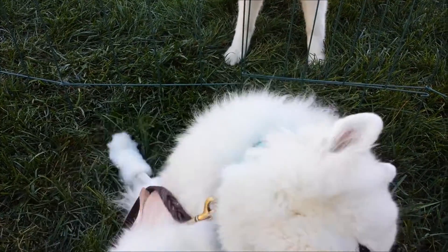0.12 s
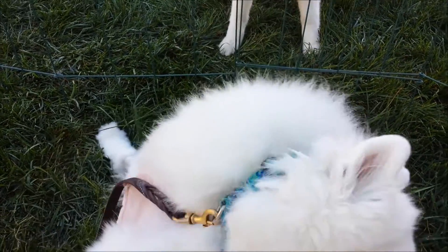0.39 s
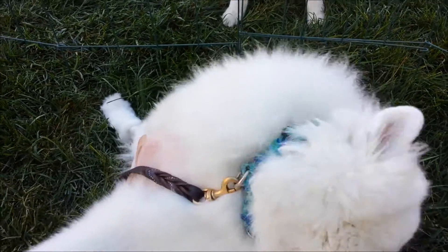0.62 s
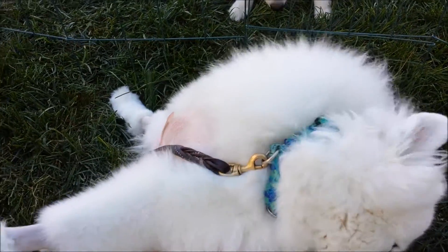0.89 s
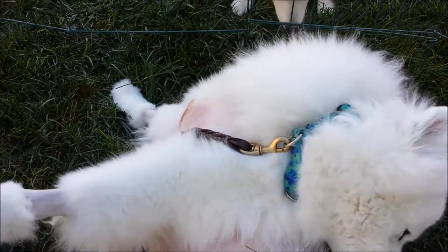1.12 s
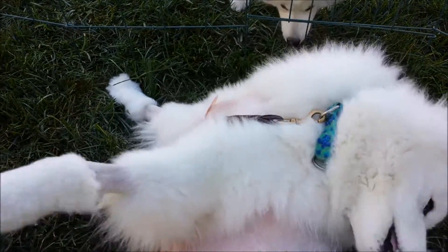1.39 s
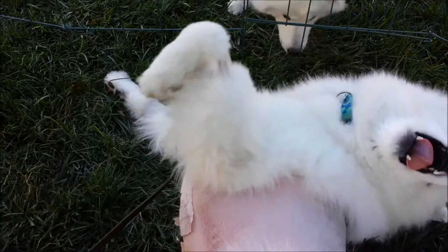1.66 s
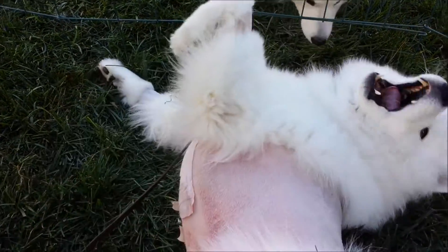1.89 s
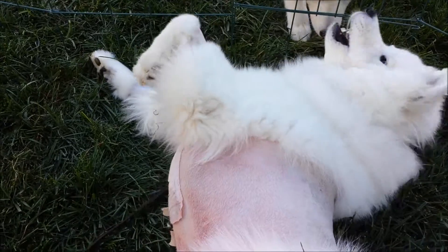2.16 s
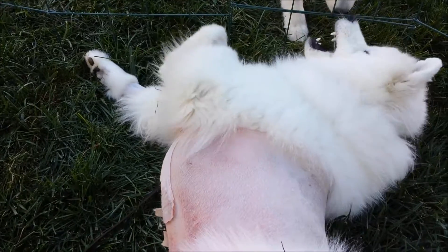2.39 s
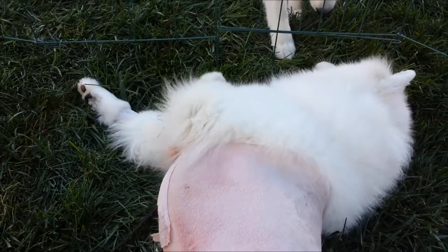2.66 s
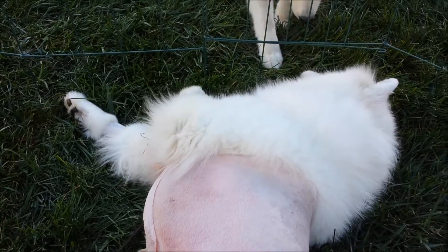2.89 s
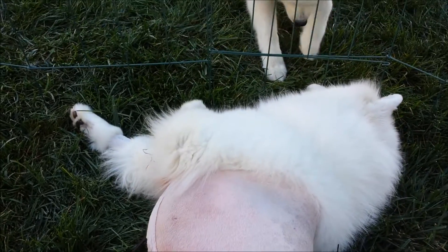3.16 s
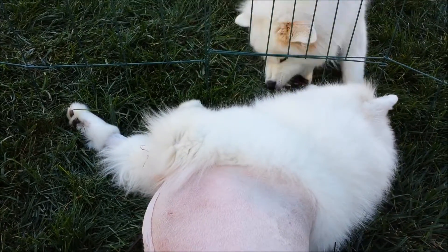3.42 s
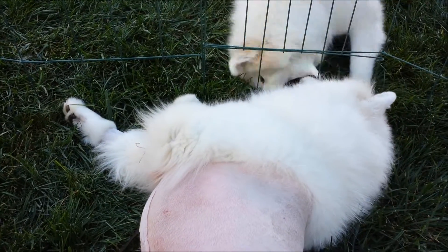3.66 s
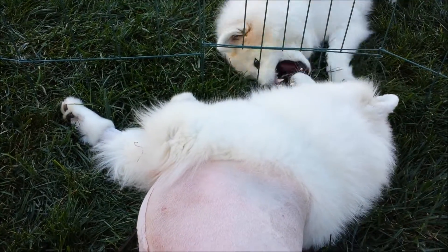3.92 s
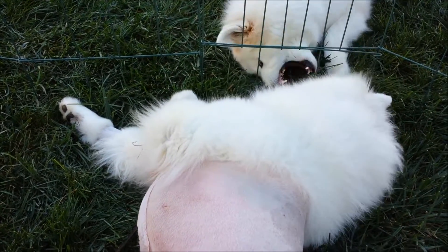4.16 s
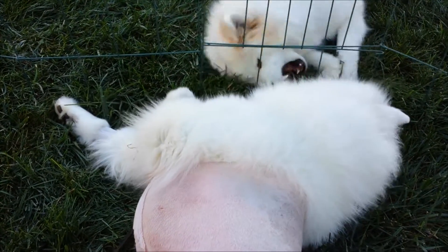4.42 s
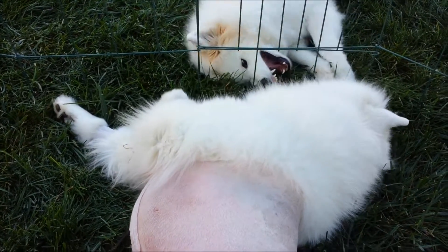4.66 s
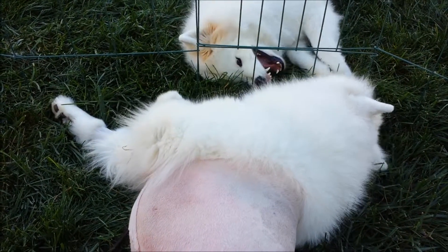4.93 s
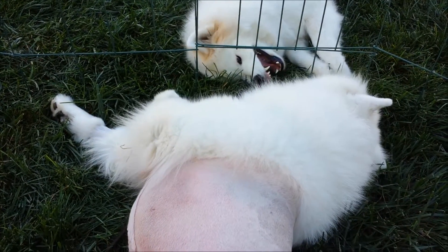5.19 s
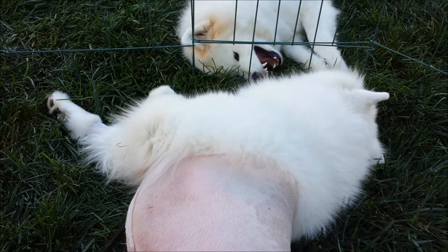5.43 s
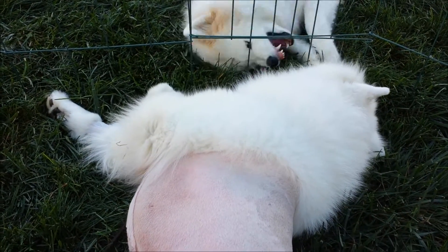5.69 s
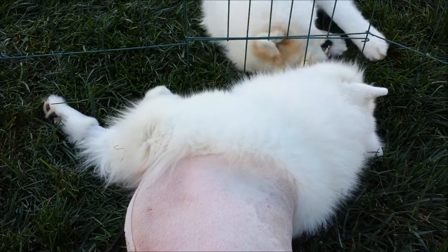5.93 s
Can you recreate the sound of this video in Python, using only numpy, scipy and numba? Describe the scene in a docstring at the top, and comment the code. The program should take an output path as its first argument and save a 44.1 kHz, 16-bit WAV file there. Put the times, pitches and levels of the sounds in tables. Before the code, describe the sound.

Small metal ticks and soft grass rustles over throbbing crickets, then short rough puppy growls at close range, a second puppy humming low near the end.

```python
"""Two puppies play-growl in short bursts on a lawn, an arm's length from a phone. One has loose vocal folds that
flap unevenly and ring chest, throat and mouth, with breath whistling past its teeth; the other hums a wavering
tone late on. Fur and paws rustle as crackly, flickering noise, paws thud as soft noise bursts, and a leash clasp
ticks as short snaps. Behind them crickets throb as a narrow band of noise, over broad noise for distant traffic
and leaves."""
import sys
import numpy as np
from scipy import signal
from scipy.fft import rfft, irfft
from scipy.io import wavfile
from scipy.ndimage import uniform_filter1d
from numba import njit

SR = 44100
rng = np.random.default_rng(int(sys.argv[2]) if len(sys.argv) > 2 else 0)


def undo_db(level):
    """Turn decibels back into plain size, where 20 dB means ten times bigger."""
    steps = np.asarray(level, float) / 20
    return 10 ** steps


def to_wav(sig):
    """Store sig (one row per channel, or 1-D mono) as 16-bit WAV at the path in sys.argv[1].

    Samples outside -1..1 are clipped; the rate is SR.
    """
    pcm = np.clip(np.atleast_2d(sig), -1, 1) * 32767
    pcm = np.round(pcm).astype(np.int16)
    wavfile.write(sys.argv[1], SR, pcm.T)  # frames by channels


N = 267246  # length in samples

# One table per growl. Each row: time in seconds, effort in dB, jaw opening as throat ring over effort in dB,
# lips drawn back as mouth ring over effort in dB.
GROWL_TABLES = [
    [(2.81, -71, -18, -16), (2.838, -40.5, -12, -23), (2.886, -32, -6, -11), (3.052, -35, -12.5, -17.5),
     (3.114, -25.5, -1, -5.5), (3.136, -22.5, -6.5, -13), (3.152, -20.5, 2, -9), (3.198, -32, -19, -22),
     (3.23, -41, -37, -14)],
    [(3.23, -36.5, -20, -13), (3.25, -44, -17, -14), (3.28, -22.5, -8.5, -19), (3.3, -20, 4.5, -23),
     (3.336, -32.5, 21.5, 8), (3.356, -37.5, 19.5, 8), (3.376, -37.5, -9, -10), (3.402, -39, -8.5, -5.5),
     (3.44, -53, 5.5, 4)],
    [(3.44, -50.5, 4, 8), (3.468, -35.5, -14.5, -10), (3.56, -28.5, -20, -10.5), (3.576, -31, -11, -11.5),
     (3.63, -40.5, -17, -14.5), (3.796, -38, -18, -23), (3.818, -56, -36, -2), (3.83, -48, -3, -25)],
    [(3.83, -40.5, -19, -16), (3.868, -46, -21.5, -24.5), (4.038, -42.5, -10.5, -2.5),
     (4.09, -48.5, -5, -8)],
    [(4.09, -39.5, -50, -31), (4.13, -26, -17, -15.5), (4.168, -21.5, -2.5, -7.5),
     (4.204, -31.5, -24, -1.5), (4.226, -44.5, -15, -13.5), (4.26, -45, -15, -1)],
    [(4.26, -43, -18, -10), (4.302, -32.5, -22, -18.5), (4.33, -19.5, -12.5, -16),
     (4.352, -20.5, -1.5, -4.5), (4.388, -29.5, -9, -17), (4.4, -63, -18, 10)],
    [(4.4, -45, -1, 0), (4.41, -52, 14.5, 20.5), (4.428, -34.5, -3, -9), (4.458, -30, -16, -2),
     (4.49, -26.5, -7.5, 2.5), (4.512, -40.5, -25, -4), (4.524, -31, -1, 3), (4.57, -50, -10, -9)],
    [(4.57, -42.5, -14, -11), (4.83, -45.5, -17, -33), (4.944, -57, -15, -21), (4.98, -81, -3.5, -7)],
    [(5.32, -64, -25, -33), (5.34, -39.5, -12, -11), (5.356, -26.5, -16, -13.5), (5.402, -26, -11.5, -10.5),
     (5.478, -30, -6, -4), (5.542, -30, -13, -13), (5.662, -23, -8.5, -7.5), (5.678, -28, 0, -4.5),
     (5.71, -31.5, -17, -15.5), (5.75, -36, -9.5, -3.5), (5.79, -39, -21, -24)],
    [(5.79, -47, -25, -9), (5.824, -33, -3, -5), (5.846, -37, -15, -9), (5.936, -30.5, -14.5, -19),
     (6.018, -31.5, -15.5, -11.5), (6.058, -31, -13, -11.5)],
]
# How unevenly the folds flap. Each row: time in seconds, roughness from 0 to 1.
FOLD_ROUGHNESS = [(2.8, .55), (3.1, .4), (3.2, .45), (3.3, .55), (3.44, .6), (3.5, .4), (3.8, .3),
                  (3.84, .1), (4.06, .1), (4.12, .4), (4.38, .45), (4.45, .9), (4.58, .15), (4.95, .2),
                  (5.3, .6), (5.55, .5), (5.65, .6), (5.8, .45), (5.92, .4)]
# Folds and cavities. Each row: time in seconds, average fold rate in Hz, chest pitch in Hz,
# throat pitch at rest in Hz, mouth pitch in Hz.
VOCAL_TRACT = [(2.8, 70.23, 150, 760, 2460), (2.92, 92.44, 153, 900, 2080), (3.05, 88.86, 162, 840, 2250),
               (3.165, 138.5, 207, 820, 2220), (3.195, 105, 157, 855, 3350), (3.25, 90.24, 167, 1010, 3300),
               (3.28, 114.4, 202, 820, 2310), (3.355, 156.8, 307, 830, 2900), (3.4, 92.4, 240, 886, 2200),
               (3.47, 78.25, 159, 1180, 2331), (3.55, 99.5, 182.8, 1110, 2344),
               (3.66, 62.87, 152, 970, 2300), (3.8, 71.07, 143, 1050, 2350), (3.83, 80.4, 160, 990, 2392),
               (4.12, 84.95, 164, 766, 2350), (4.165, 94.52, 179.7, 810, 2110),
               (4.2, 68.23, 133, 1070, 2560), (4.28, 89.9, 137, 1210, 3550),
               (4.33, 112.3, 180.3, 938.5, 2440), (4.37, 100.1, 169.1, 1047, 2400),
               (4.42, 79.97, 228, 1220, 2630), (4.5, 98.65, 205, 990, 2520),
               (4.56, 77.13, 217.3, 960, 2680), (4.75, 82.9, 158.6, 1065, 2560),
               (5.32, 85, 160.1, 890, 2495), (5.4, 83.8, 234.3, 880, 2448), (5.47, 95.34, 184, 854.7, 2410),
               (5.58, 99.1, 204, 880.8, 2420), (5.65, 113.8, 208, 829, 2280),
               (5.72, 118.2, 190.1, 950, 2290), (5.78, 105.8, 149.9, 1140, 2550),
               (5.85, 104.4, 160.1, 1080, 2530), (5.93, 131.8, 205, 766, 2300)]
# Plain tone of the folds, lost where they slap or break up. Each row: time in seconds, dB over effort.
FOLD_TONE = [(3.0, -2.5), (3.13, 1.5), (3.29, -5), (3.32, -12), (3.55, 2), (3.7, -8), (3.84, 2),
             (4.16, -6.5), (4.31, 2), (4.42, -6.5), (4.6, 0), (5.38, -4), (5.5, 0.5), (6.0, 5)]
# Hardest slaps of the folds. Each row: time in seconds, rough throat peak in dB, mouth relative to throat in dB.
FOLD_SLAPS = [(2.862, -32, -10), (2.891, -28.5, -9), (3.091, -28, 0), (3.146, -21, -14),
              (4.115, -28.5, -6.5), (4.319, -34, -14.5), (4.334, -23.5, -8), (4.353, -17.5, -7),
              (4.438, -31, -3), (4.461, -27, 0), (4.521, -37.5, 5), (5.342, -33.5, 4), (5.405, -29, 7),
              (5.427, -36.5, 15), (5.471, -25.5, 3.5), (5.503, -32.5, 8), (5.534, -29.5, 4),
              (5.577, -28.5, 5), (5.617, -28.5, 2)]
# Side cavities that join in as the jaws part. Each row: pitch in Hz, width of each filter pass in Hz,
# level in dB when fully open.
THROAT_CAVITIES = [(820, 544, 3), (1203, 370, 1.5)]
MOUTH_CAVITIES = [(1850, 370, 0), (2685, 490, 0)]
# The hollow behind the palate rings above the mouth. Each row: time in seconds, pitch in Hz,
# dB over the mouth ring.
PALATE_RING = [(2.8, 3480, -12), (3.12, 3180, -15), (3.2, 3400, -11), (3.3, 3070, -18), (3.35, 3370, -2.5),
               (3.5, 3980, -14.5), (4.1, 3300, -10), (4.17, 2948, -4), (4.23, 3760, 4.5), (4.33, 3729, -20),
               (4.37, 4000, -6.5), (5.35, 3740, -18), (5.47, 3804, -8.5), (5.65, 3740, -15),
               (6.06, 3479, -3.5)]
# Air whistling past bared teeth. Each row: start in seconds, length in seconds, pitch in Hz, level in dB.
TEETH_WHISTLES = [(3.281, 0.015, 6070, -40), (3.304, 0.032, 5950, -39), (3.544, 0.038, 7460, -49),
                  (4.179, 0.023, 5430, -42.5), (4.317, 0.049, 8000, -32.5), (4.335, 0.05, 6310, -35),
                  (4.48, .008, 6150, -19), (5.346, 0.14, 6572, -45.5)]
# The other puppy, one table per hum. Each row: time in seconds, pitch in Hz, level in dB.
PARTNER_HUMS = [
    [(5.36, 261.6, -35), (5.425, 233.1, -29)],
    [(5.63, 242.2, -36), (5.7, 197.9, -28.5)],
    [(5.8, 160, -37), (5.84, 152.8, -30), (5.9, 148.2, -38), (5.96, 176.7, -32.5), (6.06, 173, -29.5)],
]
# Fur, snorts of the dogs and paws in the grass. Each row: start in seconds, hold in seconds, level in dB,
# fade in dB per second, share above 9 kHz in dB.
RUSTLES = [(0, 0.0039, -48, 333, -14), (.125, 0.045, -47.5, 238, -12), (0.28, 0.11, -59, 264, -16),
           (1.682, .02, -64, 60, -10), (2.04, 0.014, -59.5, 73, -15), (3.086, 0.099, -52.5, 119, -15),
           (3.302, 0.036, -43.5, 196, -16), (3.376, 0.17, -52, 54, -18), (3.742, 0.025, -51, 178, -5),
           (4.134, 0.049, -49.5, 48, -10.5), (4.186, 0.011, -41.5, 700, -23.5),
           (4.361, 0.035, -37.5, 297, -23), (4.414, 0.018, -27, 292, -11.5), (4.482, 0.0053, -27, 600, -22),
           (4.503, 0.0069, -45, 900, -13.5), (4.532, 0.012, -35, 900, -26),
           (4.633, 0.025, -47.5, 187, -15.5), (5.04, 0.0054, -60, 203.5, -28),
           (5.348, 0.078, -49, 54, -11.5), (5.606, 0.14, -52.5, 70, -10), (5.753, .02, -47.5, 153, -13),
           (5.823, 0.02, -45.5, 79, -11.5)]
# Tone colour of the rustle below its treble. Each row: pitch in Hz, width of each filter pass in Hz, level in dB.
RUSTLE_BANDS = [(3760, 1400, 11), (6375, 3510, 22.5), (4640, 2200, 17)]
# Clasp and wire ticks. Each row: time in seconds, peak of the snap in dB, centre in Hz.
CLASP_TICKS = [(0.114, -30.5, 6900), (0.136, -21.5, 8340), (0.211, -32.5, 6700), (0.2998, -24.5, 7100),
               (0.308, -18, 7200), (0.327, -26, 6700), (0.5376, -27.5, 5830), (0.7535, -32, 5100),
               (1.69, -34.5, 6260), (1.704, -40, 6600), (2.048, -37.5, 7160), (3.713, -34.5, 6116),
               (4.4049, -16, 7417), (4.44, -12, 6200), (4.462, -12, 5700), (4.5223, -16.5, 5500),
               (4.577, -26.5, 7250), (4.646, -27.5, 7300), (4.679, -29, 7400), (4.8585, -33.5, 2870),
               (5.0426, -32, 7415), (5.749, -28.5, 5800), (5.8179, -24, 5060)]
# Ring of the metal clasp. Each row: pitch in Hz, dB relative to the snap peak, time to fall 60 dB in seconds.
CLASP_RING = [(8100, -21, 0.019), (8700, -27, 0.027), (9200, -20.5, 0.083)]
# Paws and body on the turf, one a short squeak. Each row: time in seconds, peak in dB, centre in Hz,
# width of each filter pass in Hz, time for the noise to fall 60 dB in seconds.
TURF_THUDS = [(.005, -36, 231, 163, 0.011), (1.049, -36.5, 211, 171, 0.26), (1.12, -48, 1533, 70, 0.03),
              (1.693, -41, 830, 810, 0.19), (2.114, -46.5, 1630, 630, 0.3), (2.336, -45.5, 1100, 694, 0.1)]
# Balance of the background air. Each row: pitch in Hz, relative level in dB per Hz.
AIR_SPECTRUM = [(22, 2), (108, 9.5), (592, -11), (823, -8.5), (1500, -16), (2530, -13.5), (2990, -29),
                (5170, -16.5), (6620, -20.5), (8710, -24.5), (15500, -32)]
# How alike background noise is on both sides. Each row: pitch in Hz, likeness from -1 to 1.
AIR_LIKENESS = [(60, 0.99), (130, 0.95), (290, 0.82), (640, 0.28), (1410, -0.67), (3100, 0.51),
                (6820, -0.12), (15000, 0.43)]
# Side balance of the background. Each row: pitch in Hz, left minus right in dB.
AIR_BALANCE = [(380, -0.5), (4400, 2), (15000, 0.5)]
# The two microphone ports, for a source just in front. Each row: pitch in Hz, left minus right in dB.
PORT_BALANCE = [(60, -1.5), (200, 0), (380, 0.5), (700, 1.5), (1290, 4.5), (2380, 8.5), (4400, 12.5),
                (8120, 3), (15000, -39.5)]
# Timing between the ports. Each row: pitch in Hz, lead of the left port in radians.
PORT_PHASE = [(60, 0.15), (400, 0.21), (1380, 1.14), (2580, 0.8245), (9000, 0.5)]

CHEST_WIDTH, THROAT_WIDTH, MOUTH_WIDTH, PALATE_WIDTH = 130., 350., 480., 520.  # Hz, each filter pass
CHEST_DB, CHEST_TOP_HZ, VOICE_TOP_HZ = -2, 495, 4100.
SLACK_ROUGH, SLACK_DB = 0.28, -25  # smoother folds do not close; chest ring lost at roughness 0, in dB
HUM_FULL_DB, HUM_GROWTH = -31, 0.49  # past this effort the plain tone grows by only this share of each dB
THROAT_HZ_PER_JAW_DB = 12  # the throat pitch climbs as the jaws gape
FLAPS_PER_JAW_DB = .035  # a gaping snarl sets more loose tissue flapping
GAP_WIDTH = 520.  # Hz; the tongue darkens the stretch between throat and mouth
TEETH_WIDTH, TEETH_EDGE_S = 850., .008  # Hz for each filter pass, seconds
RUSTLE_ATTACK_S, STIR_DB, STIR_TOP_DB = 0.029, -65, -12  # the grass never lies quite still
AIR_DB = -52
CRICKET_HZ, CRICKET_WIDTH, CRICKET_DB = 6580., 340., -65  # level at full throb
CRICKET_RATE, CRICKET_START = 4.93, .09  # throbs per second, seconds
YARD_T60_S, YARD_DB = .15, -16.  # seconds to fall 60 dB, level against the direct sound
PEAK, TOP_HZ = 1.8, 15800  # ceiling for rounded peaks, top of the phone's range


def unit(x, size=None):
    """Scale to an average (rms) level of 1, overall or within a sliding window."""
    power = np.mean(x ** 2) if size is None else uniform_filter1d(uniform_filter1d(x ** 2, size), size)
    return x / np.sqrt(power + 1e-18)


def over_hz(table, hz):
    """Read (Hz, value) points on a log-frequency axis, as pitch is heard."""
    points = np.array(table)
    return np.interp(np.log(hz + 1), np.log(points[:, 0] + 1), points[:, 1])


def over_time(tables, level_columns):
    """Join curve tables; the level columns fall silent where no table sounds."""
    rows, t = np.vstack(tables), np.arange(N) / SR
    columns = [np.interp(t, rows[:, 0], column) for column in rows.T[1:]]
    on = 0
    for table in tables:
        start, end = table[0][0], table[-1][0]
        on = on + np.clip(np.minimum(t - start + .002, end + .002 - t) / .004, 0, 1)
    return [undo_db(column) * on if k in level_columns else column for k, column in enumerate(columns)]


@njit
def svf(x, hz, width):
    """One resonance whose centre can move, with gain 1 there (state-variable band-pass)."""
    y, b, l = np.empty(len(x)), 0., 0.
    for i in range(len(x)):
        g, k = np.tan(np.pi * hz[i] / SR), width / hz[i]
        v = (b + g * (x[i] - l)) / (1 + g * (g + k))
        b, l, y[i] = 2 * v - b, l + 2 * g * v, k * v
    return y


def band(x, hz, width):
    """A resonance applied twice, for dark valleys."""
    hz = np.clip(hz * np.ones(len(x)), 20, .45 * SR)
    once = svf(x + 1e-18, hz, 1. * width)
    return svf(once, hz, 1. * width)


def walk(rate):
    """Random levels held 1 / rate s and smoothed twice; spread near 1."""
    hold = int(SR / rate)
    steps = np.repeat(rng.standard_normal(N // hold + 1), hold)
    return 1.3 * uniform_filter1d(uniform_filter1d(steps, hold), hold)[:N]


def diffuse(hz, width):
    """One band of noise from all around, as alike at the ports as its pitch allows."""
    alike, left_db = np.clip(over_hz(AIR_LIKENESS, hz), -.95, .99), over_hz(AIR_BALANCE, hz)
    mid, side = (unit(band(rng.standard_normal(N), hz, width)) for _ in range(2))
    sign = np.array([[1], [-1]])
    pair = np.sqrt(1 + alike) * mid + sign * np.sqrt(1 - alike) * side
    return undo_db(sign * left_db / 2) * pair / np.sqrt(1 + alike)


def air():
    """Distant traffic and leaves: bands of noise that swell together and flicker alone."""
    swell, bands = walk(0.13), 0
    for hz in 40 * 2 ** np.arange(0, 8.9, .4):
        # a wider band holds more Hz, hence the log term
        db = over_hz(AIR_SPECTRUM, hz) + 10 * np.log10(hz) + 0.14 * swell + 0.63 * walk(5.73)
        bands = bands + undo_db(db) * diffuse(hz, .5 * hz)
    return undo_db(AIR_DB) * bands / np.sqrt(np.mean(bands.mean(axis=0) ** 2))


def crickets():
    """A narrow trill, made of noise, that throbs about five times a second."""
    t = np.arange(N) / SR
    throb = np.clip(1.0 + np.sin(2 * np.pi * CRICKET_RATE * (t - CRICKET_START)), 0, 1)
    return undo_db(CRICKET_DB + 0.98 * walk(0.382)) * throb * diffuse(CRICKET_HZ, CRICKET_WIDTH)


def rustle():
    """Hiss with crackling blades in it; each band flickers on its own, so the treble is patchy."""
    t = np.arange(N) / SR
    gain, top_gain = undo_db(STIR_DB), undo_db(STIR_DB + STIR_TOP_DB)
    for s, hold, db, fade_db, top_db in RUSTLES:
        attack = np.clip((t - s) / RUSTLE_ATTACK_S + 1, 0, 1) ** 2
        swish = attack * undo_db(db - fade_db * np.clip(t - s - hold, 0, 2))
        gain, top_gain = gain + swish, top_gain + undo_db(top_db) * swish
    crackle = (rng.random(N) < 1500 / SR) * rng.standard_normal(N) * undo_db(2.1 * rng.exponential(size=N))
    grain = (rng.standard_normal(N) + .4 * unit(crackle)) * undo_db(3.2 * walk(120))
    low = sum(undo_db(db + 2.2 * walk(45)) * band(grain, hz, width) for hz, width, db in RUSTLE_BANDS)
    treble_only = signal.butter(4, 9200, "high", fs=SR, output="sos")
    top = undo_db(1.3 * walk(24.88)) * signal.sosfilt(treble_only, band(grain, 14200.0, 9690.0))
    return gain * unit(low, size=1500) + top_gain * unit(top, size=6000)


def thuds():
    """Soft blows: a burst of noise in one resonance."""
    out, t = np.zeros(N + 8192), np.arange(8192) / SR
    chance = rng.standard_normal((len(TURF_THUDS), len(t)))
    for (s, db, hz, width, t60), noise in zip(TURF_THUDS, chance):
        burst = noise * (1 - np.exp(-t / 0.0022)) * 1000 ** (-t / max(t60, .01))
        blow = band(burst, hz, width)
        start = int(s * SR)
        out[start:start + len(t)] += undo_db(db) * blow / np.abs(blow).max()
    return out[:N]


def ticks():
    """A short broad snap, a little scrape after it, and at first the ring of the small metal clasp."""
    out, t = np.zeros(N + 4096), np.arange(4096) / SR
    chance = rng.standard_normal((len(CLASP_TICKS), len(t)))
    ring = sum(undo_db(db) * np.sin(2 * np.pi * hz * t) * 1000 ** (-t / t60) for hz, db, t60 in CLASP_RING)
    for (s, db, hz), noise in zip(CLASP_TICKS, chance):
        dangling = s < .6  # later the fur muffles the clasp
        snap_and_scrape = np.exp(-t / .0008) + .3 * np.exp(-t / .005)
        snap = band(noise * snap_and_scrape, hz, .7 * hz)
        start = int(s * SR)
        out[start:start + len(t)] += undo_db(db) * (snap / np.abs(snap).max() + dangling * ring)
    return out[:N]


def throat_ring(x, hz):
    """The throat rings at its pitch, with side cavities that join in as that pitch climbs."""
    opening = np.clip((hz - 800) / 300, .25, 1)
    sides = sum(undo_db(db) * band(x, f, width) for f, width, db in THROAT_CAVITIES)
    return band(band(x, hz, THROAT_WIDTH) + opening * sides, 1.257 * hz, 2360.0)


def mouth_ring(x, hz, opening):
    """The mouth rings with its side cavities; soft walls keep the skirts dark."""
    sides = sum(undo_db(db) * band(x, f, width) for f, width, db in MOUTH_CAVITIES)
    return band(band(x, hz, MOUTH_WIDTH) + opening * sides, hz, 2000.)


def growls():
    """Fold closures of uneven length and strength, each with a puff of air, ring chest, throat and mouth."""
    hz, chest_hz, throat_hz, mouth_hz = over_time([VOCAL_TRACT], ())
    effort, jaw_db, lips_db = over_time(GROWL_TABLES, (0,))
    rough = np.interp(np.arange(N) / SR, *np.transpose(FOLD_ROUGHNESS))
    gape_db = np.maximum(jaw_db, 0)
    held_back = undo_db(HUM_FULL_DB) * (effort / undo_db(HUM_FULL_DB)) ** HUM_GROWTH
    tone_over_effort, = over_time([[(0, 0)] + FOLD_TONE + [(N / SR, 0)]], (0,))
    hum = np.minimum(effort, held_back) * tone_over_effort
    chest = effort * undo_db(CHEST_DB + SLACK_DB * np.clip(1 - rough / SLACK_ROUGH, 0, 1))
    throat, mouth = effort * undo_db(jaw_db), effort * undo_db(lips_db)
    throat_hz = throat_hz + THROAT_HZ_PER_JAW_DB * gape_db

    turns = np.cumsum(hz * np.clip(1 + .17 * rough * walk(60), .4, 2)) / SR
    cycle, phase = turns.astype(int), turns % 1
    # now and then strong and weak closures take turns
    alternation = 4 * walk(8) * (-1) ** cycle
    strength = undo_db(rough * (6 * rng.standard_normal(N // 100)[cycle] + alternation))
    closures = strength * (np.diff(cycle, prepend=0) > 0)
    # loose tissue flaps again at random moments within the cycle
    flap_now = rng.random(N) < (4 + .3 * gape_db) * hz / SR
    flaps = flap_now * undo_db(-5 + 2 * rng.standard_normal(N))
    flap_share = .3 + .6 * rough + FLAPS_PER_JAW_DB * gape_db
    beats = unit(closures * undo_db(-.4 * gape_db) + flap_share * flaps, size=1500)
    # at low effort the folds barely close and plain breath takes over
    breath = np.clip(undo_db(-49) / (throat + mouth + 1e-9), 0, 3)
    puff_level = (.5 + 1.5 * rough) * strength * np.exp(-phase / .27) + breath
    puffs = puff_level * rng.standard_normal((2, N))  # one for the throat, one for the mouth

    low = unit(band(closures + 2.5 * rough ** 2 * flaps, chest_hz, CHEST_WIDTH), size=1300)
    low = signal.sosfilt(signal.butter(2, CHEST_TOP_HZ, fs=SR, output="sos"), low)
    tone = unit(uniform_filter1d(strength, size=300), size=2000) * np.sqrt(2) * np.sin(2 * np.pi * turns)

    # tongue and cheeks shake with the folds, so the cavities wobble
    throat_hz, mouth_hz = (f * (1 + .07 * rough * walk(60)) for f in (throat_hz, mouth_hz))
    mouth_open = np.clip((mouth_hz - 2190) / 270, .05, 1)
    slaps = np.zeros((2, N))
    s, db, mouth_db = np.transpose(FOLD_SLAPS)
    at = (s * SR).astype(int)
    # a unit pulse rings a doubled resonance to about twice its width / SR
    slaps[0, at] = undo_db(db) * SR / THROAT_WIDTH / 2
    slaps[1, at] = undo_db(db + mouth_db) * SR / MOUTH_WIDTH / 2
    mouth_drive = beats / 2 + puffs[1]
    upper = throat * unit(throat_ring(beats + puffs[0], throat_hz), size=700)
    upper = upper + mouth * unit(mouth_ring(mouth_drive, mouth_hz, mouth_open), size=600)
    upper = upper + throat_ring(slaps[0], throat_hz) + mouth_ring(slaps[1], mouth_hz, mouth_open)
    palate_hz, palate = over_time([PALATE_RING], (1,))
    palate_sound = band(mouth_drive, palate_hz * (1 + 0.033 * walk(45)), PALATE_WIDTH)
    upper = upper + mouth * palate * unit(palate_sound, size=600)
    upper = upper - (1 - mouth_open) * svf(upper, (throat_hz + mouth_hz) / 2, GAP_WIDTH)
    upper = signal.sosfilt(signal.ellip(4, 1, 30, VOICE_TOP_HZ, fs=SR, output="sos"), upper)
    return hum * tone + chest * low + upper + teeth(puffs[0] + 0.16 * rng.standard_normal(N))


def teeth(puffs):
    """Narrow bursts of breath, a puff to each fold cycle, each burst at the pitch of its gap."""
    t, out = np.arange(N) / SR, np.zeros(N)
    for s, length, hz, db in TEETH_WHISTLES:
        span = slice(int((s - .02) * SR), int((s + length + .02) * SR))
        inside = np.minimum(t[span] - s, s + length - t[span])
        gate = np.clip(inside / TEETH_EDGE_S + 1, 0, 1) ** 2
        out[span] += undo_db(db) * gate * unit(band(puffs[span], hz, TEETH_WIDTH))
    return out


def partner():
    """The other puppy's low hum: a single tone wavering in pitch and level."""
    hz, gain = over_time(PARTNER_HUMS, (1,))
    level = gain * undo_db(1.5 * walk(40))
    turns = np.cumsum(hz * (1 + .03 * walk(50))) / SR
    return level * np.sqrt(2) * np.sin(2 * np.pi * turns)


def ports(x):
    """The phone body shades the two ports differently; their mean stays the sound that arrived."""
    hz = np.fft.rfftfreq(N, 1 / SR)
    ratio = undo_db(over_hz(PORT_BALANCE, hz)) * np.exp(1j * over_hz(PORT_PHASE, hz))
    return irfft(rfft(x) * 2 * np.array([ratio, 1 + 0 * ratio]) / (1 + ratio), N)


def yard(x):
    """Faint scattered echoes from ground and fences, different at each port."""
    t = np.arange(int(.4 * SR)) / SR
    tail = rng.standard_normal((2, len(t))) * 1000 ** (-t / YARD_T60_S) * (t > .003)
    tail = signal.lfilter([1, -1], [1, -.95], tail)  # thins the bass
    tail = tail / np.sqrt(np.sum(tail[0] ** 2))
    return undo_db(YARD_DB) * signal.fftconvolve(x[None], tail, axes=1)[:, :N]


def scene():
    """Near sources through the ports and the yard, over the background from all around."""
    near = growls() + partner() + ticks() + thuds() + rustle()
    # the rustling area is wide: part of it reaches the ports from opposite sides
    wide = undo_db(-7.5) * rustle() * np.array([[1], [-1]])
    return ports(near) + wide + yard(near) + air() + crickets()


def low_pass(x):
    """Removes everything above the highest recorded frequency."""
    return signal.sosfilt(signal.butter(12, 16360, fs=SR, output="sos"), x)


def record(dry):
    """The phone rounds the loudest peaks, then cuts the deep bass and the top."""
    rounded = PEAK * np.tanh(dry / PEAK)
    bass_cut = signal.butter(3, 44, "high", fs=SR, output="sos")
    top_cut = signal.ellip(6, .3, 30, TOP_HZ, fs=SR, output="sos")
    mix = signal.sosfilt(np.vstack([bass_cut, top_cut]), rounded)
    return low_pass(mix)


dry = scene()
out = record(dry)
to_wav(out)
```